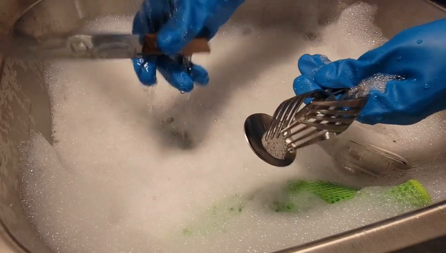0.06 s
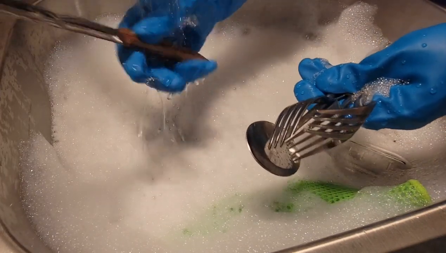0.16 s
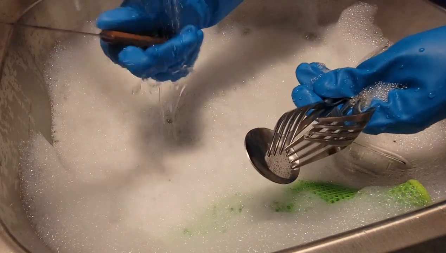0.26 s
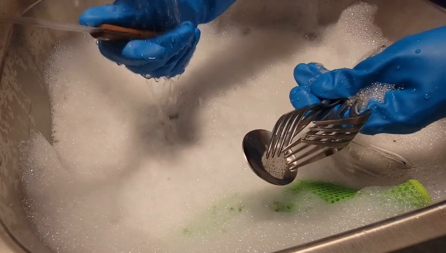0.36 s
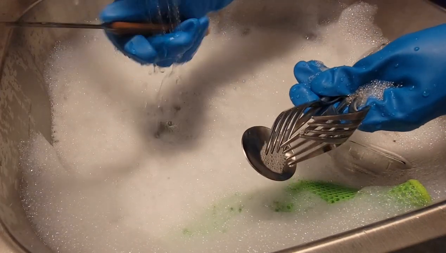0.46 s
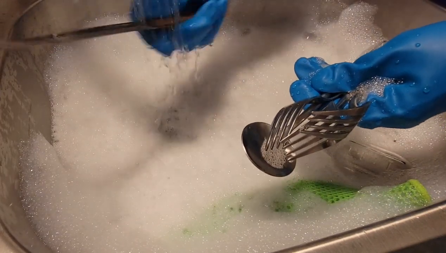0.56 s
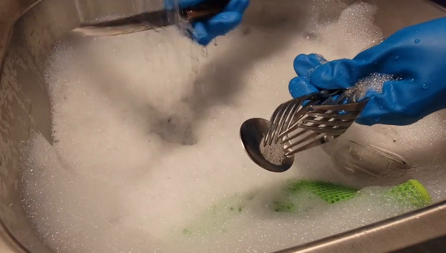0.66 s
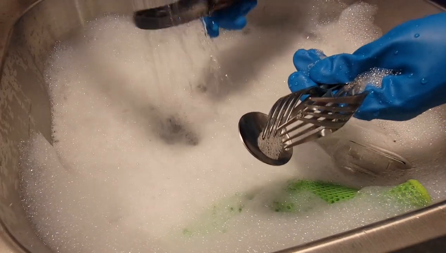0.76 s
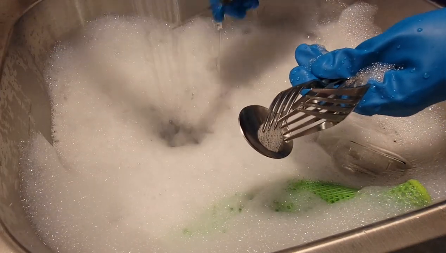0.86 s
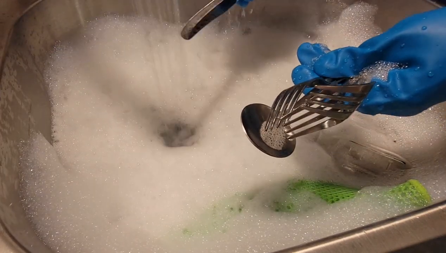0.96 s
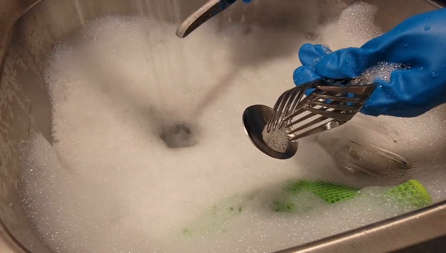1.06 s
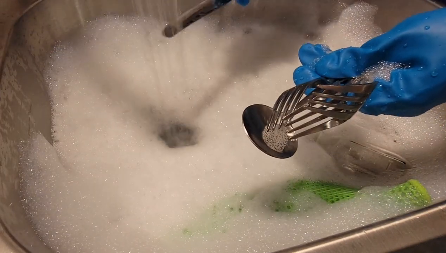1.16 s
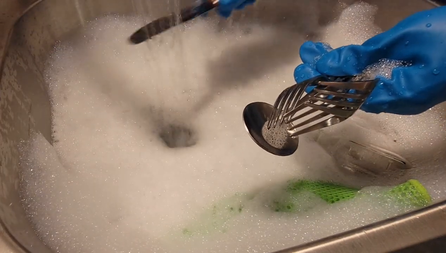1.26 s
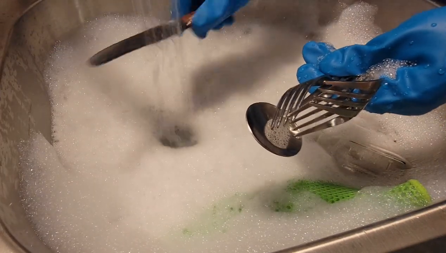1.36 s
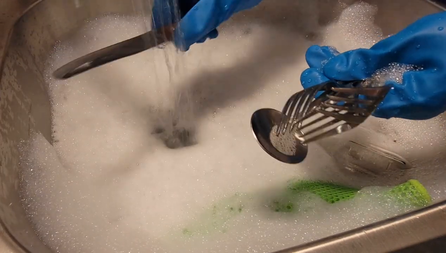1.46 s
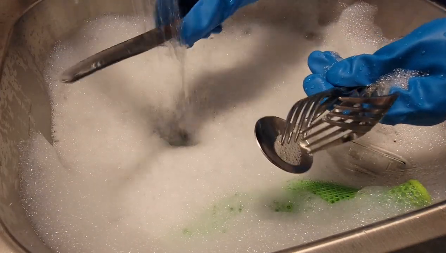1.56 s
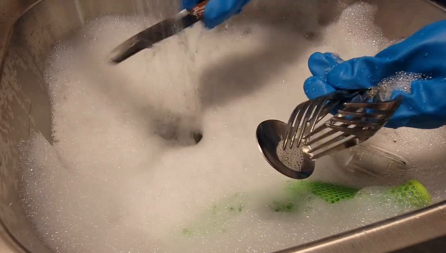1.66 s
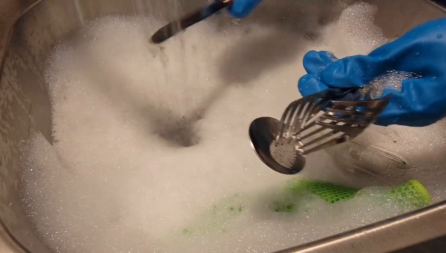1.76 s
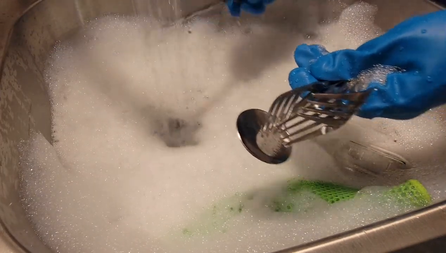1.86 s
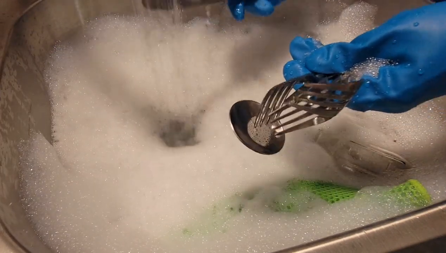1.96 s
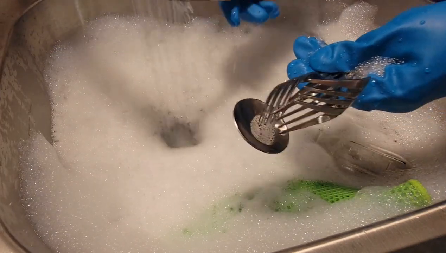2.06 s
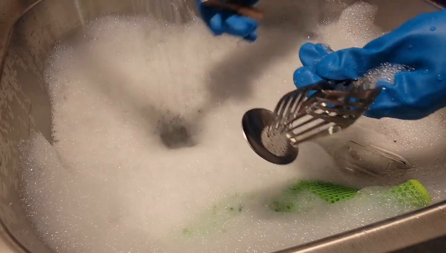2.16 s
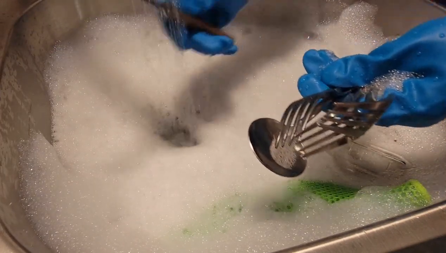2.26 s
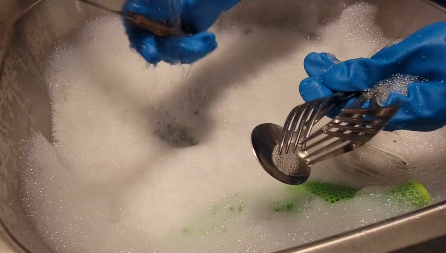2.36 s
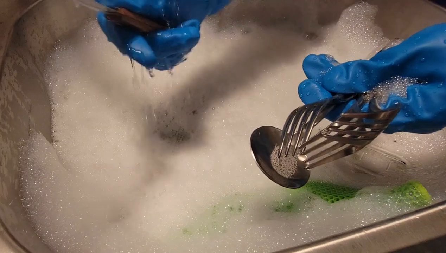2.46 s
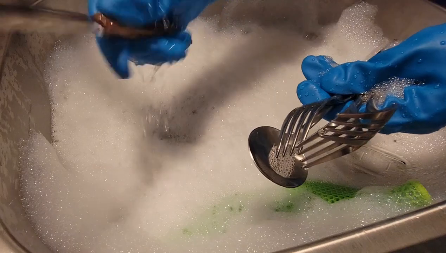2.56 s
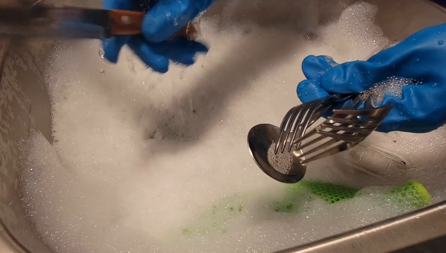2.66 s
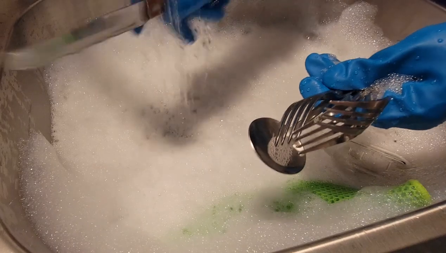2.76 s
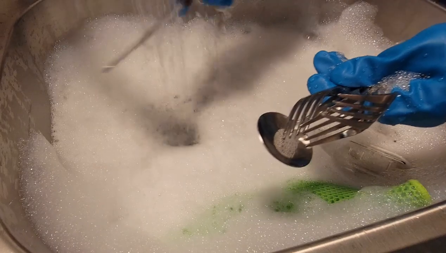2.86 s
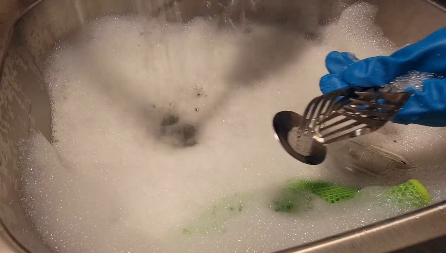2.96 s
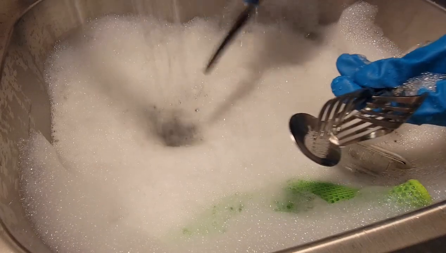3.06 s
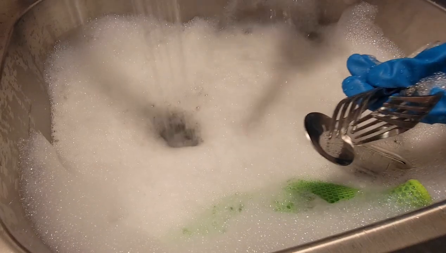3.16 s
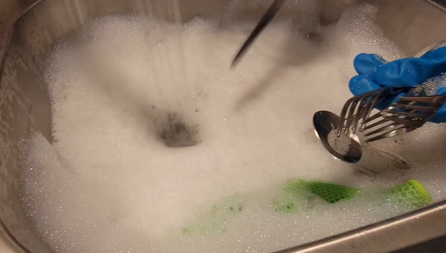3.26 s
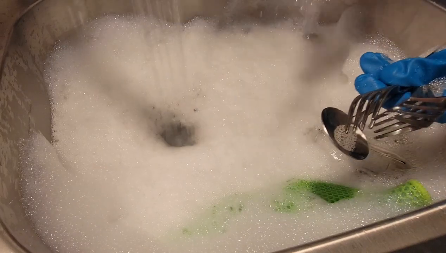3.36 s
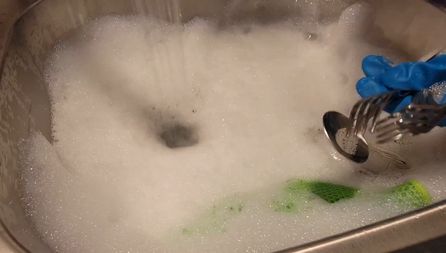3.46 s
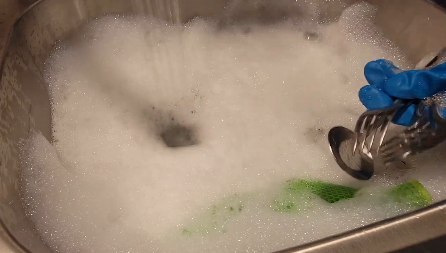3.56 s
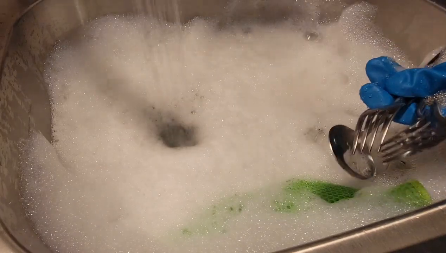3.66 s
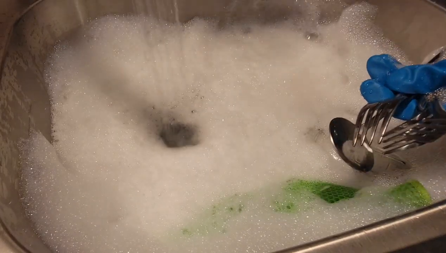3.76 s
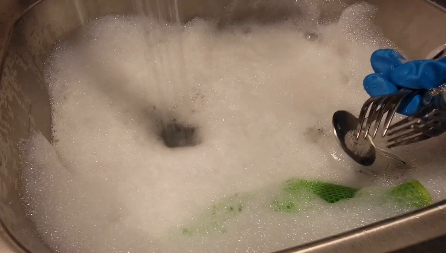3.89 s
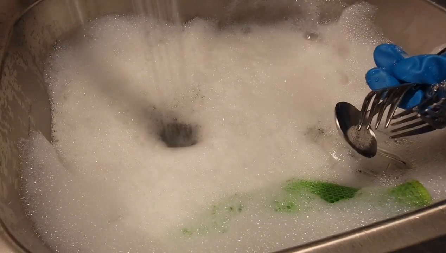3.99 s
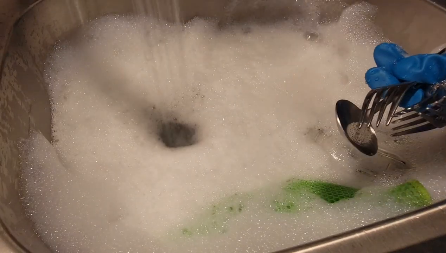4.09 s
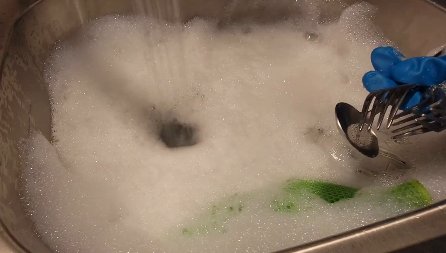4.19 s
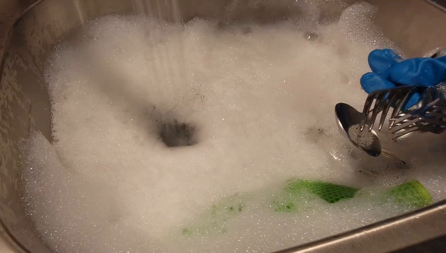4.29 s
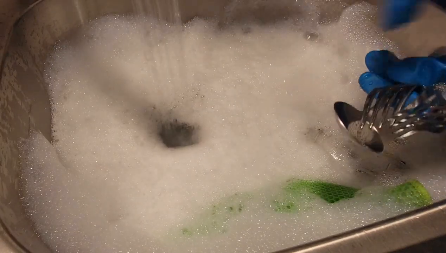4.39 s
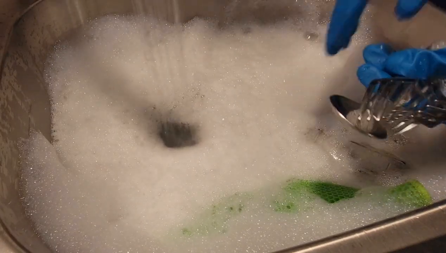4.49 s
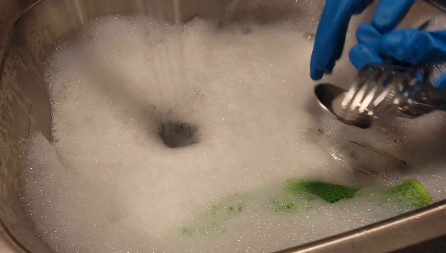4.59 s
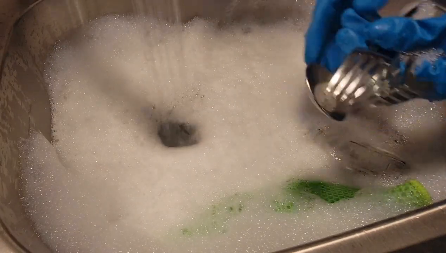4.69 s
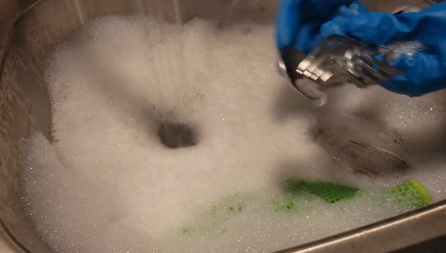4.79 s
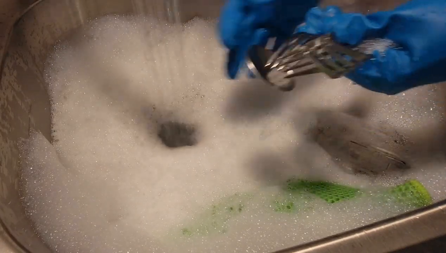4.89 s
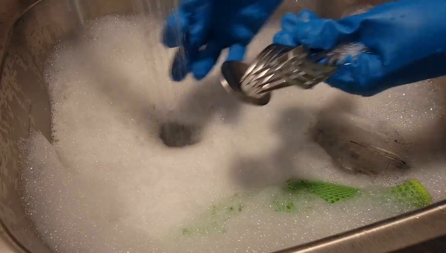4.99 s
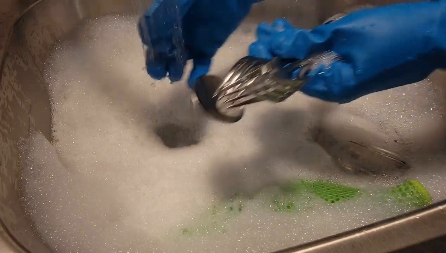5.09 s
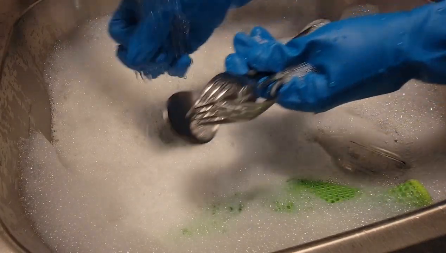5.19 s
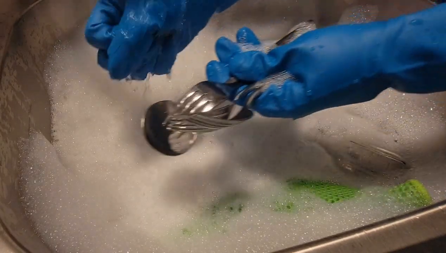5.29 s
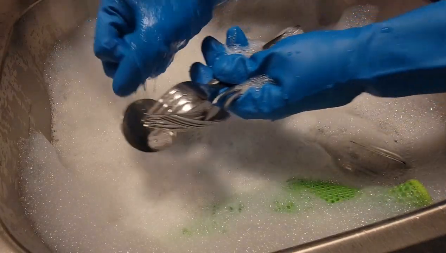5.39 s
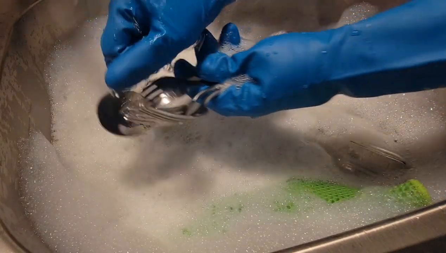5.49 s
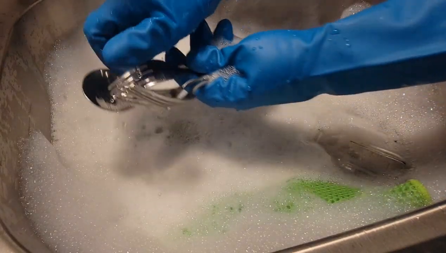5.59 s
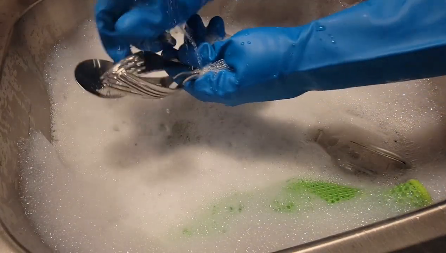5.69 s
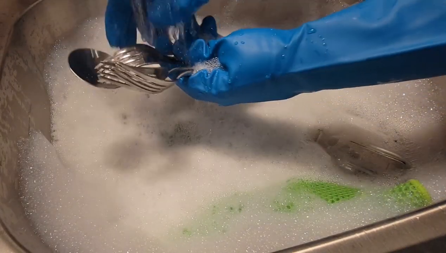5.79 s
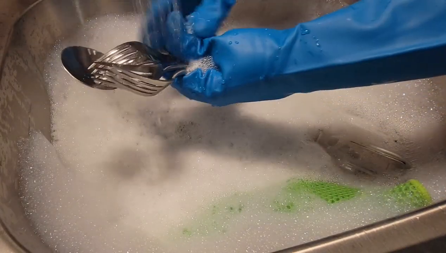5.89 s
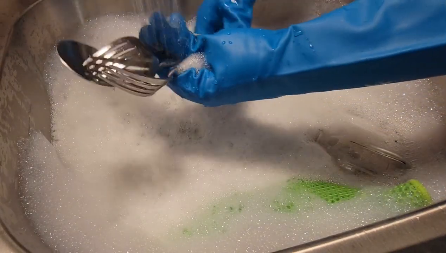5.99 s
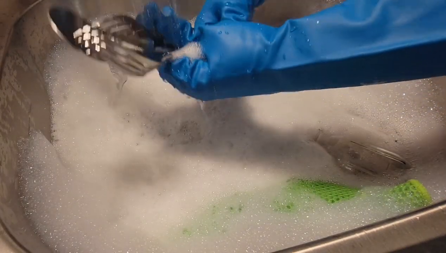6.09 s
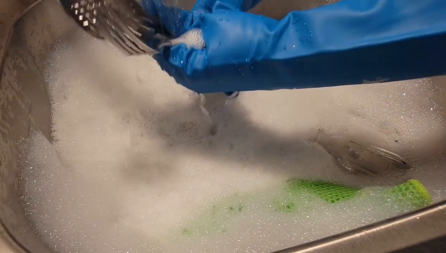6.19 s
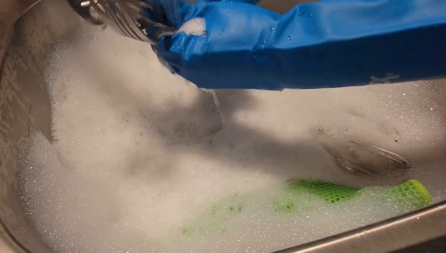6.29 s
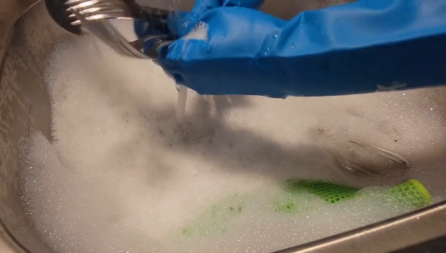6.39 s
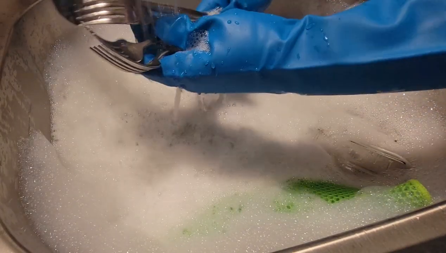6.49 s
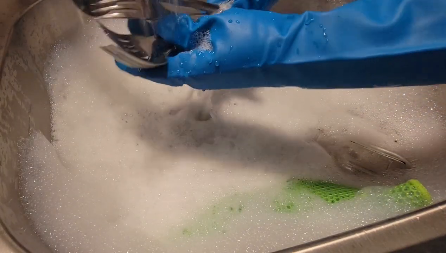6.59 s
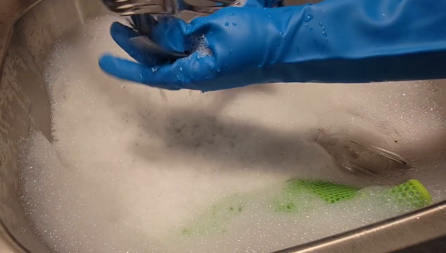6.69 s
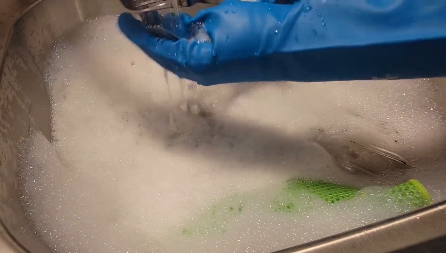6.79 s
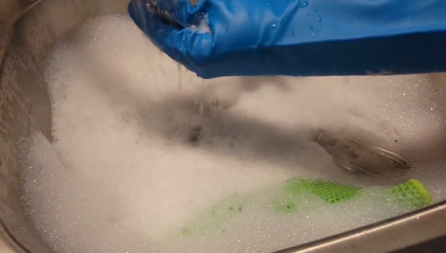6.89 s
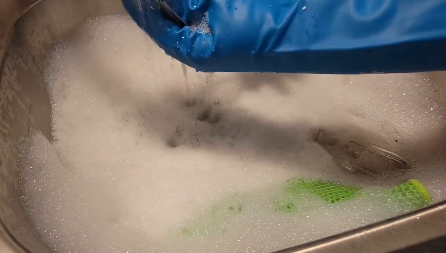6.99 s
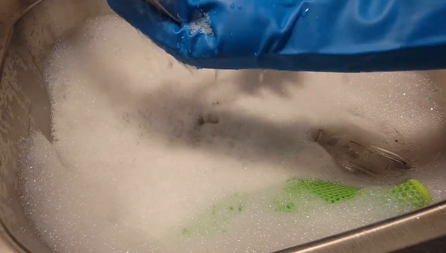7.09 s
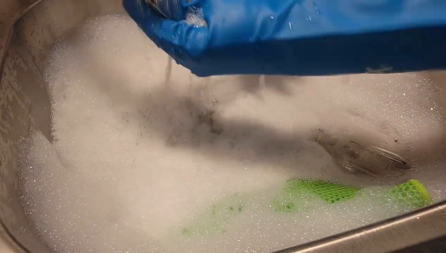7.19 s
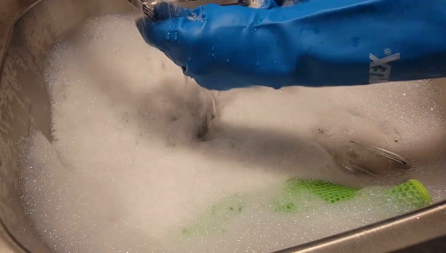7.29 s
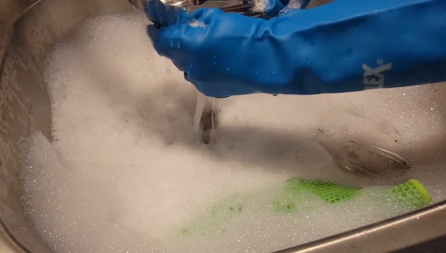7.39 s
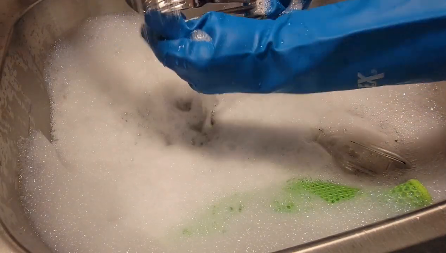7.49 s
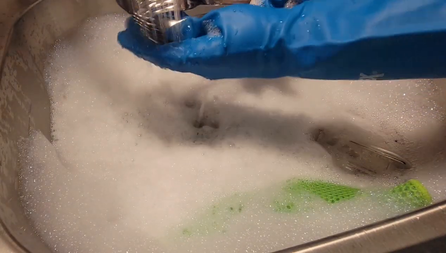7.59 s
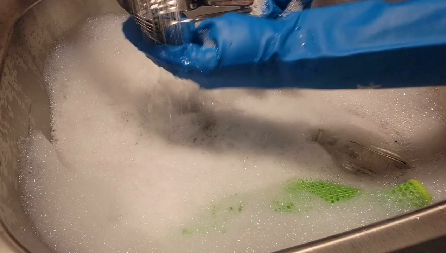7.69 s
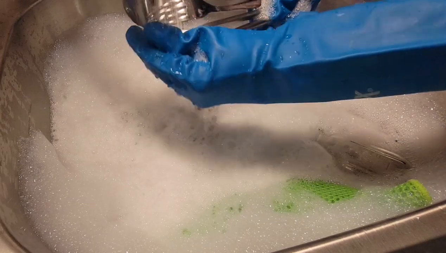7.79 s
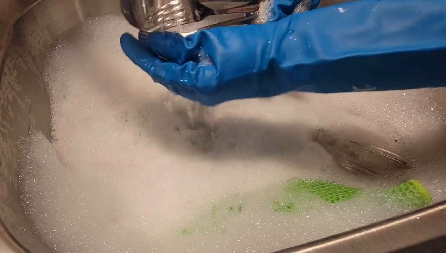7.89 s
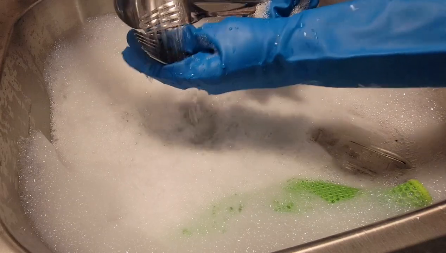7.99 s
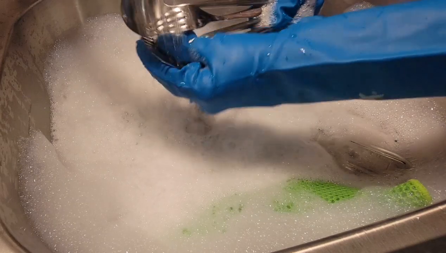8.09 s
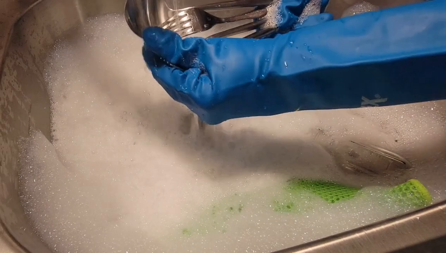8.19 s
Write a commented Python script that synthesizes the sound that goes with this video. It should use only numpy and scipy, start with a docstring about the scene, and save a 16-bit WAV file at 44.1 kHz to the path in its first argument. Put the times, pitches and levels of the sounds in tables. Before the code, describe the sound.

A close stereo view of a steel sink full of foam in a small kitchen with a short echo and faint low appliance hum. From 0 s a tap stream hisses and patters on suds; a gloved hand dulls it until about 0.9 s, then hollow gurgling opens up, dips around 1.4-1.9 and again near 2.4-3.1 s. Bubbles plop, especially around 3.0-3.4 s, as the gurgle returns fully. At 3.5 s a strong dull thump booms with a rattle, a softer one at 3.75 s, then a knife clatters and bounces at 4.03-4.16 s, to the right. Light cutlery clicks at 4.55 and 4.75 s, a short metallic scrape at 5.27 s. From 5.2 s gloves cover the jet: gurgle vanishes, leaving muted drumming on rubber, splashy rinsing bursts, snapping drops and clinks near 6.0, 6.9 and 8.0 s.

```python
"""A running tap strikes foam in a steel sink while cutlery is rinsed: droplet noise and tiny bubbles.
The jet's hollow gurgles as bubble swarms; hands across the jet turn it to drumming on rubber gloves.
Rinsed cutlery throws off splashes; single bubbles plop and drops snap.
Cutlery clicks and scrapes, and a knife is set down with two dull thumps and a clatter: decaying modes
and noise bursts. Sines make an appliance hum over filtered-noise room murmur."""
import sys
import numpy as np
from scipy import signal
from scipy.fft import rfft, irfft, next_fast_len
from scipy.io import wavfile
from scipy.ndimage import map_coordinates

SR = 44100
rng = np.random.default_rng(int(sys.argv[2]) if len(sys.argv) > 2 else 0)


def inscribe(sig):
    """Save sig as 16-bit PCM at rate SR to the path in sys.argv[1].

    A 1-D sig is mono; a 2-D sig holds one channel per row.
    Samples are clipped to [-1, 1] before scaling.
    """
    pcm = np.round(np.clip(np.atleast_2d(sig).T, -1, 1) * 32767)
    wavfile.write(sys.argv[1], SR, pcm.astype(np.int16))


N = 363825

# single large bubbles: (time [s], level [dB], starting pitch [Hz])
BUBBLES = [(.088, -41, 1480), (1.148, -32, 1670), (1.328, -37, 1750), (2.286, -36, 885), (2.336, -33, 936),
           (3.005, -31.5, 2070), (3.219, -35, 1750), (3.277, -38, 1050), (3.348, -32, 850),
           (3.349, -36.5, 1520), (3.776, -36.5, 880), (4.357, -33, 1564), (4.451, -32.5, 950),
           (4.525, -35.5, 946), (4.664, -36, 860), (4.82, -37, 1630), (5.058, -36, 1820),
           (7.683, -45, 1550), (7.938, -37.5, 1640)]
# largest drops snapping on gloves and foam: (time [s], level [dB], starting pitch [Hz])
DROPS = [(0.35, -36, 12800), (.467, -45, 3000), (0.6083, -35, 12300), (.624, -38, 12600),
         (1.206, -30, 15100), (1.531, -34, 7600), (1.563, -34, 12200), (3.9012, -27, 12100),
         (5.1821, -34, 14400), (5.425, -43, 14300), (5.7767, -34, 10150), (6.056, -31.5, 4750),
         (6.1072, -37, 6230), (6.1342, -37, 4630), (6.1576, -30.5, 13800), (6.2424, -36.5, 4370),
         (6.2734, -39.5, 7720), (6.33, -32, 14400), (6.494, -37, 4240), (6.5657, -43, 4510),
         (6.5845, -41, 4430), (6.7632, -40, 13400), (6.8862, -31.5, 5140), (7.1538, -35, 12200),
         (7.441, -32.5, 12700), (7.684, -37.5, 4400), (7.736, -40, 4000), (7.9974, -40, 4270),
         (8.054, -39, 4600), (8.0612, -33, 4408), (8.088, -39, 4000), (8.1438, -32, 12500),
         (8.157, -37, 4650)]
# blows on the sink: (time [s], level [dB], rattle re blow [dB], loss per octave above main mode [dB])
THUMPS = [(3.498, -15, -14.5, -5), (3.74, -23.5, -21, 10), (3.934, -48, -18, 0), (4.256, -43, -20, 2)]
# knife bounces: (time [s], level [dB])
KNIFE_BOUNCES = [(4.0261, -17.5), (4.0308, -22.5), (4.072, -21.5), (4.077, -23.5), (4.108, -33),
                 (4.1426, -32), (4.1635, -30.5)]
# cutlery contacts: (time [s], level [dB], brightness [dB/octave], bundle jolt re level [dB])
CLICKS = [(3.004, -47, -9.5, -2), (4.549, -28.5, 1, -24), (4.555, -30, 4, -24), (4.748, -31.5, 3, -24),
          (4.763, -32.5, 7, -24), (5.9996, -29, 2.5, -10), (6.011, -33.5, 1, -12), (6.068, -38, -2, 2),
          (6.08, -42, -1, 3), (6.175, -42, 4, -8), (6.328, -38, -1, -9), (6.362, -45, 3, -20),
          (6.8992, -26.5, 0, -12), (7.0712, -40.5, -1, -20), (7.115, -41, -1, -18),
          (7.3182, -37, -3.5, -24), (7.347, -44, -2.5, -24), (7.591, -37.5, -1, -5), (7.718, -46, 6, -23),
          (7.78, -41, -1, -8), (8.022, -27, 3.5, -6.5)]
# modes of the sink, knife and cutlery: (frequency [Hz], level [dB], t60 [s])
SINK_MODES = [(260, -11.5, 0.064), (333, 3, 0.055), (326, -25, 0.27), (335, -26.5, 0.34),
              (352.5, -27, 0.25), (384, -17.5, 0.071), (438, -17.5, 0.13), (570, -22, 0.12),
              (624, -11.5, 0.083), (745, -26, .09), (860, -32, 0.1), (1290, -24, 0.08)]
KNIFE_MODES = [(2265, -5.5, .2), (2420, -1.5, 0.16), (2675, 0, 0.15), (2870, -1, 0.11), (3110, -4, 0.15),
               (3840, -6, 0.14), (3950, 2.5, 0.099), (4330, -1.5, 0.1), (5480, -12, 0.089), (6160, -7, .12),
               (7100, -7, 0.1), (7500, -1, 0.14), (11900, -4, .11), (14600, -4, .13)]
CUTLERY_MODES = [(1480, 0, 0.056), (4400, 0, 0.07), (6020, 0, 0.12), (7550, 3, 0.14), (7940, 3, 0.1),
                 (8800, 0, 0.12), (9900, 2, 0.16), (11430, -2, 0.12), (12000, 1, .1), (13900, 8, .15),
                 (14640, 1, 0.14), (15200, -1, .1)]
# noise spectra of water on foam and gloves: (frequency [Hz], relative density [dB])
SPRAY_SPECTRUM = [(2500, -27), (4500, 0.5), (6000, -7), (7400, -4.5), (8600, -9.5), (10300, -7),
                  (12200, -2.5), (14200, 2.5), (15400, -2.5), (16000, -4)]
PATTER_SPECTRUM = [(500, -12.5), (800, -3), (1100, -8), (1450, 2), (2000, 3.5), (2250, -2.5), (3000, 0.5),
                   (4300, -6.5), (5600, -14), (8000, -24)]
SPLASH_SPECTRUM = [(900, -29), (1500, -7.5), (2300, -1.5), (3300, 3.5), (4500, 2.5), (5400, -12.5),
                   (7300, -6), (8600, -15), (10800, -7), (13000, -0.5), (16000, -18)]
DRUM_SPECTRUM = [(150, -25), (300, 1), (400, 0.5), (560, -4), (700, -4.5), (1100, -23)]
# noise spectrum of the kitchen murmur: (frequency [Hz], relative density [dB])
KITCHEN_SPECTRUM = [(44, -34), (75, 4), (85, -22), (103, 0), (118, -3), (140, -10), (221, -11), (254, -17),
                    (320, -2.5), (376, -7.5), (408, -23), (491, -5), (612, -18), (656, -19.5),
                    (1200, -16.5), (1560, -15.5), (2640, -120)]
# noise spectra of metal contacts: (frequency [Hz], relative density [dB])
RATTLE_SPECTRUM = [(120, -24), (220, 1), (620, 11.5), (950, -1), (1300, 2), (1800, -1), (2150, -10),
                   (2600, -2), (3050, 0), (3600, -9), (4350, 0), (5000, -22), (7700, -12.5), (9000, -20),
                   (16000, -21)]
CLANK_SPECTRUM = [(300, -15), (1000, -3.5), (2000, -10), (2600, 3), (4200, -0.5), (4900, 0.5), (5600, 0.5),
                  (7500, -0.5), (8800, -6), (12000, -2), (15800, 1.5)]
TICK_SPECTRUM = [(300, -34), (900, -25), (1400, 1.5), (2600, -8), (3800, 1), (5200, -3.5), (7300, -3.5),
                 (8500, -10.5), (10500, -1), (12500, -0.5), (15000, -2.5), (16000, -15)]
JOLT_SPECTRUM = [(200, -14), (450, 1), (800, -1), (1150, -4), (1700, -1), (2600, -6), (4000, -22)]
GRIT_SPECTRUM = [(1000, -23), (1600, -1), (3200, -8), (4700, -2), (5200, -17), (6000, 1), (7800, 0),
                 (9500, -4), (13000, -10), (14200, 2), (15200, -3), (16000, -10)]
# tone of the water in the sink, slightly dull around 1-2 kHz: (frequency [Hz], gain [dB])
WATER_TONE = [(250, -0.5), (700, -1.5), (1100, -4.5), (2000, -3.5), (3000, -1.5), (4500, 0)]
# standing waves between the sink's walls: (frequency [Hz], level re direct sound [dB])
STANDING_WAVES = [(380, -2.5), (572, -3.5), (872, -5), (945, -15), (1088, 5.5), (1288, -3), (1445, -4),
                  (1610, -2), (1790, -2.5), (1995, 0.5), (2150, -11), (2470, -0.5), (2710, -9),
                  (2950, -6.5)]
# appliance hum: (frequency [Hz], rms level [dB])
HUM = [(59.4, -58), (108, -75), (217, -73)]
# stereo balance of spray and drops: (frequency [Hz], left minus right [dB])
SPRAY_SIDE = [(1000, 4), (2400, 1), (4400, -2.5), (8000, 16.5), (15000, 4.5)]
DROP_SIDE = [(4400, 2), (8000, 10), (14000, 10)]
# room decay: (frequency [Hz], t60 [s])
ROOM_T60 = [(200, 0.5), (2000, 0.15), (14000, 0.098)]
# jet drumming on rubber: (start [s], end [s], level [dB])
DRUMMING = [(0.05, 0.16, -61), (0.38, 0.66, -66), (2.38, 2.49, -60.5), (5.05, 5.3, -60.5),
            (5.5, 5.68, -58.5), (5.98, 6.12, -57), (7.6, 8.22, -65)]
# knife or glove across the jet: (start [s], end [s], cover [dB])
COVERS = [(-0.3, 3.14, 1), (0.07, 0.85, 10.5), (1.42, 1.92, 5), (2.43, 3.16, 6), (2.5, 2.89, 7),
          (5.2, 8.6, 14)]
# cutlery turned in the jet: (start [s], end [s], splashing level [dB])
RINSES = [(0.02, 0.13, -57.5), (2.92, 3.08, -54.5), (5.2, 5.55, -63), (5.96, 6.56, -52), (6.83, 6.98, -54),
          (7.1, 7.38, -53.5), (7.6, 7.85, -54.5), (7.99, 8.22, -50.5)]
# pitch of the hollow, higher where a weakened jet bores a smaller one: (time [s], pitch [Hz])
HOLLOW = [(0.9, 905), (1.33, 877), (1.55, 970), (1.8, 1000), (2.2, 970), (2.3, 890), (2.451, 990),
          (3.18, 966), (3.29, 1020), (3.35, 874), (3.46, 920), (3.65, 860), (4.45, 914), (4.9, 870),
          (5.2, 885)]

# water gain under the free jet [dB], and loss per dB of cover [dB/dB]
SPRAY_DB, SPRAY_LOSS = -49.5, 1.46
PATTER_DB, PATTER_LOSS = -48.5, 0.81
GURGLE_DB, GURGLE_LOSS = -54, 1.7
SPLASH_DB, SPLASH_LOSS = -56.5, 0.58
RINSE_SPRAY_DB, RINSE_PATTER_DB, RINSE_SPLASH_DB = -2, -8, -1  # re the RINSES level
RINSE_EDGE_S, DRUM_EDGE_S, HAND_EDGE_S = 0.19, 0.057, 0.25  # rise and fall of each kind of spell
DRIBBLE_DB = -69.5  # steady run-off on the gloves
RUN_OFF_DB = -69  # droplets falling from the gloves
HOLLOW_WANDER_HZ = 20
DIRECT_DB = -1.5  # direct path re scattered sound
LEFT_LEADS_S, DETOUR_S = 0.00014, 0.0014  # left-side lead; longest extra path by way of a wall
WAVE_WIDTH_HZ = 34.7
CLICK_ATTACK_S, JOLT_ATTACK_S = 0.00066, 0.005
SLIDE_S, SLIDE_DB = 5.268, -44  # a spoon sliding along a fork
SLIDE_ATTACK_S, SLIDE_HOLD_S = 0.0093, 0.031
TOP_HZ = 15950


def amp(db):
    """Decibels to gain."""
    return np.exp(np.asarray(db) * (np.log(10) / 20))


def unit(x):
    """Scale to rms 1."""
    return x / np.sqrt(np.mean(x ** 2) + 1e-20)


def along(points, hz):
    """Interpolate (Hz, value) points on a log frequency axis."""
    f, v = np.transpose(points)
    return np.interp(np.log(hz + 1), np.log(f + 1), v)


def wobble(rate):
    """A smooth random curve with rate knots per second."""
    knots = rng.standard_normal(int(N * rate / SR) + 4)
    coarse = np.linspace(0, N, num=2000)
    curve = map_coordinates(knots, [coarse * rate / SR])
    return np.interp(np.arange(N), coarse, curve)


def filtered(x, response):
    """Apply a frequency response to x."""
    n = x.shape[-1]
    m = next_fast_len(n + 8192)
    spectrum = rfft(x, m) * response(np.fft.rfftfreq(m, 1 / SR))
    return irfft(spectrum, m)[..., :n]


def coloured(x, spectrum):
    """Shape x by a spectrum and scale to rms 1."""
    return unit(filtered(x, lambda hz: amp(along(spectrum, hz))))


def pan(side_db):
    """Left and right gains for a left-minus-right level."""
    return amp(np.array([[.5], [-.5]]) * side_db)


def add(track, s, sound):
    """Mix a sound into the track at time s."""
    part = track[:, max(round(s * SR), 0):][:, :sound.shape[-1]]
    part += sound[..., :part.shape[1]]


def spell(start, end, edge_s):
    """Gate with smooth tanh edges centred on start and end."""
    t = np.arange(N) / SR
    return .5 + .5 * np.tanh(2 * np.minimum(t - start, end - t) / edge_s)


def swells(rows, edge_s):
    """Summed gain of (start s, end s, dB) spells."""
    return sum(amp(db) * spell(start, end, edge_s) for start, end, db in rows)


def cover():
    """Total dB of cover across the jet at each moment."""
    return sum(db * spell(start, end, HAND_EDGE_S) for start, end, db in COVERS)


def flow(free_db, loss, rinse_db):
    """Water gain: power sum of the covered jet and what rinsed cutlery throws off."""
    jet = amp(free_db - loss * cover())
    thrown = amp(rinse_db) * swells(RINSES, RINSE_EDGE_S)
    return np.hypot(jet, thrown)


def spatter(rate, spread_db):
    """Random signed impulses as droplet impacts; spread_db sets how uneven their sizes are."""
    when, size, sign = rng.random((int(rate * N / SR), 3)).T
    size = amp(-spread_db * np.log(np.maximum(size, .004))) * np.sign(sign - .5)
    return unit(np.bincount((when * N).astype(int), size, N))


def crackle(rate, spread_db, t60):
    """Each droplet impact opens a decaying noise puff: scattered noise plus a left-leading direct part."""
    keep = amp(-120 / (t60 * SR))  # energy decay per sample
    energy = signal.lfilter([1], [1, -keep], spatter(rate, spread_db) ** 2)
    puff = rng.standard_normal(N)
    direct = np.array([puff, np.roll(puff, round(LEFT_LEADS_S * SR))])
    scattered = rng.standard_normal((2, N))
    return unit(np.sqrt(np.abs(energy)) * (scattered + amp(DIRECT_DB) * direct))


def bubble(hz, cycles, rise, t):
    """A bubble loses 60 dB over the given cycles, its pitch climbing as it nears the surface."""
    age = hz * t / cycles
    tone = np.sin(2 * np.pi * hz * t * (1 + rise * np.minimum(age, 1) / 2))
    return tone * amp(-60 * age) * (1 - np.exp(-2 * hz * t))


def froth(pitch_hz, rate, scatter, cycles, spread_db, count=160):
    """A swarm of bubbles of count sizes around a moving pitch, at rms 1."""
    when, detune, size, path = rng.random((int(rate * N / SR), 4)).T
    bell = lambda u: np.log((u + .02) / (1.02 - u)) / 1.5  # uniform to bell-shaped
    start = (when * N).astype(int)
    hz = pitch_hz[start] * np.exp(scatter * bell(detune))
    sizes_hz = np.geomspace(hz.min(), hz.max(), count)
    kinds = np.searchsorted(sizes_hz[:-1], hz)
    gains = amp(spread_db * bell(size))
    t = np.arange(SR // 25) / SR
    waves = bubble(sizes_hz[:, None], cycles, 0.049, t)
    detour_s = np.maximum(2 * path - 1, 0) * DETOUR_S  # half reach the right by way of a wall
    lags = ((LEFT_LEADS_S + detour_s) * SR).astype(int)
    out = np.zeros((2, N + SR))
    for at, lag, kind, gain in zip(start, lags, kinds, gains):
        wave = gain * waves[kind]
        out[0, at:at + len(t)] += wave
        out[1, at + lag:at + lag + len(t)] += wave
    return unit(out[:, :N])


def basin(x, t60, wall_db):
    """Steel walls scatter a sound, differently to left and right: decaying-noise convolution."""
    t = np.arange(SR // 16) / SR
    walls = rng.standard_normal((2, len(t))) * amp(-60 * t / t60)
    walls *= amp(wall_db) / np.linalg.norm(walls[0])
    return x + signal.oaconvolve(np.broadcast_to(x, (2, N)), walls, axes=1)[:, :N]


def ring(modes, t, scatter_db):
    """Struck modes with random strength and phase per side; drifting phase makes them waver."""
    hz, db, t60 = np.transpose(modes)[:, :, None]
    gain = amp(db + scatter_db * rng.uniform(-1.2, 1.37, (2, len(modes), 1)))
    phase = 2 * np.pi * rng.random((2, len(modes), 1))
    steps = rng.standard_normal((len(modes), len(t)))
    waver = np.cumsum(steps, axis=1) * np.sqrt(2 * np.pi * 25 / SR)
    tones = gain * amp(-60 * t / t60) * np.sin(2 * np.pi * hz * t + phase + waver)
    return tones.sum(1) / np.linalg.norm(amp(db))


def burst(spectrum, t, t60):
    """Dense contact noise, uneven in frequency like a crowd of modes, decaying by t60."""
    knots_hz = np.linspace(0, SR / 2, num=150)
    strength_db = 3.5 * rng.standard_normal(len(knots_hz))
    noise = rng.standard_normal((2, len(t)))
    crowd = filtered(noise, lambda hz: amp(np.interp(hz, knots_hz, strength_db)))
    return coloured(crowd, spectrum) * amp(-60 * t / t60) * (1 - np.exp(-t / 0.00028))


def tap():
    """Water strikes foam: droplet puffs and tiny bubbles on a bed of fine hiss."""
    mist = amp(-6) * rng.standard_normal((2, N)) + crackle(rate=810, spread_db=3, t60=0.023)
    fizz = froth(np.full(N, 12000), rate=120, scatter=0.133, cycles=190, spread_db=5.5)
    spray = coloured(mist, SPRAY_SPECTRUM) + amp(-11.0) * fizz
    spray *= flow(SPRAY_DB, SPRAY_LOSS, RINSE_SPRAY_DB) * amp(2.05 * wobble(25))
    impacts = coloured(crackle(rate=300, spread_db=2.5, t60=0.041), PATTER_SPECTRUM)
    beads = froth(np.full(N, 2500), rate=220, scatter=0.3, cycles=26, spread_db=4.5)
    patter = impacts + amp(-6.5) * beads
    patter *= flow(PATTER_DB, PATTER_LOSS, RINSE_PATTER_DB) * amp(1.03 * wobble(18))
    return filtered(spray + patter, lambda hz: pan(along(SPRAY_SIDE, hz)))


def gurgle():
    """The jet drags air into its hollow: large bubbles near its pitch, smaller ones about an octave up."""
    pitch_hz = np.interp(np.arange(N) / SR, *np.transpose(HOLLOW))
    pitch_hz = pitch_hz + HOLLOW_WANDER_HZ * wobble(14)
    large = froth(pitch_hz, rate=260, scatter=.048, cycles=40, spread_db=3.6)
    stray = froth(1.04 * pitch_hz, rate=200, scatter=0.096, cycles=29, spread_db=-0.5)
    small = froth(1.88 * pitch_hz, rate=200, scatter=0.106, cycles=37, spread_db=5)
    bubbles = amp(3.0) * large + amp(-8) * stray + amp(-2.5) * small
    return amp(GURGLE_DB - GURGLE_LOSS * cover() + 2.0 * wobble(21.94)) * bubbles * pan(1.2)


def gloves():
    """The jet drums on rubber and breaks into splashes: noise puffs and small bubbles."""
    flecks = coloured(crackle(rate=210, spread_db=1.7, t60=0.035), SPLASH_SPECTRUM)
    beads = froth(np.full(N, 4100), rate=190, scatter=0.188, cycles=42, spread_db=1.5)
    splash = flecks + amp(-5.5) * beads
    splash *= flow(SPLASH_DB, SPLASH_LOSS, RINSE_SPLASH_DB) * amp(0.49 * wobble(30))
    drum_gain = np.hypot(amp(DRIBBLE_DB), swells(DRUMMING, DRUM_EDGE_S))
    drum = drum_gain * coloured(crackle(rate=150, spread_db=0, t60=0.029), DRUM_SPECTRUM)
    return splash * pan(1.4) + drum


def run_off():
    """Sparse droplets fall from wet gloves and tick on the foam as short high bubbles."""
    ticks = froth(np.full(N, 12000), rate=38, scatter=0.14, cycles=14, spread_db=4)
    return amp(RUN_OFF_DB) * basin(ticks, t60=0.013, wall_db=-1.5) * pan(6)


def kitchen():
    """Slightly unsteady hum sines over the filtered-noise murmur of pipes and room."""
    t = np.arange(N) / SR
    hum = np.zeros(N)
    for hz, db in HUM:
        gain = amp(db + 0.35 * wobble(7)) * np.sqrt(2)  # rms to peak
        hum += gain * np.sin(2 * np.pi * hz * t + 0.21 * wobble(6.5))
    mid, side = coloured(rng.standard_normal((2, N)), KITCHEN_SPECTRUM)
    side = filtered(side, lambda hz: amp(along([(120, -10.0), (300, -2.5), (800, 8.5)], hz)))
    murmur = np.array([mid + side, mid - side]) * pan(0.46)
    rumble = coloured(rng.standard_normal(N), [(15, -11), (35, 8), (60, -11), (110, -23), (200, -49)])
    return hum + amp(-78.0) * rumble + amp(-59.5 + 2.4 * wobble(3.903)) * murmur


def drips():
    """Single bubbles plop with a small noise slap; drops snap as short tones with a noise splat."""
    plops, snaps = np.zeros((2, N)), np.zeros((2, N))
    t = np.arange(SR // 20) / SR
    for s, db, hz in BUBBLES:
        slap = burst(PATTER_SPECTRUM, t, t60=0.027)
        plop = bubble(hz, cycles=23.0, rise=0.049, t=t) + amp(-17) * slap
        add(plops, s, amp(db + 1.0) * plop)
    for s, db, hz in DROPS:
        splat = rng.standard_normal((2, len(t))) * amp(-60 * t / 0.0088)
        snap = bubble(hz, cycles=25, rise=0.04, t=t) + amp(-13.0) * splat
        add(snaps, s, amp(db + 0.5) * snap)
    snaps = filtered(basin(snaps, t60=0.045, wall_db=3), lambda hz: pan(along(DROP_SIDE, hz)))
    return basin(plops, t60=0.042, wall_db=-0.5) + snaps


def cutlery():
    """Spoons and forks knock: short modes and a tick of set brightness, plus a duller bundle jolt."""
    out, t = np.zeros((2, N)), np.arange(SR // 4) / SR
    for s, db, bright_db, jolt_db in CLICKS:
        tone = ring(CUTLERY_MODES, t, scatter_db=2)
        click = amp(-12.5) * tone + amp(-1.5) * burst(TICK_SPECTRUM, t, t60=0.048)
        click = filtered(click, lambda hz: amp(bright_db * np.log2(np.maximum(hz, 1500) / 8000)))
        add(out, s, amp(db) * click * (1 - np.exp(-t / CLICK_ATTACK_S)))
        jolt = burst(JOLT_SPECTRUM, t, t60=0.06) * (1 - np.exp(-t / JOLT_ATTACK_S))
        add(out, s, amp(db + jolt_db - 6) * jolt)
    return out * pan(4.3)


def thumps():
    """Blows swell the sink's low modes, each with a knife rattle pulsed at the main mode."""
    out, t = np.zeros((2, N)), np.arange(SR // 2) / SR
    main_hz = SINK_MODES[1][0]
    for s, db, rattle_db, soft_db in THUMPS:
        boom = np.zeros((2, len(t)))
        for hz, level_db, t60 in SINK_MODES:
            dull_db = soft_db * max(np.log2(hz / main_hz), 0)
            # left-right phase difference grows with frequency
            apart = np.array([[.5], [-.5]]) * min((hz / 420) ** 2, 2)
            mode = np.sin(2 * np.pi * hz * (t - .009) + apart)
            boom += amp(level_db - dull_db - 60 * t / t60) * mode
        add(out, s, amp(db + 8.5) * boom * (1 - np.exp(-(t / 0.0084) ** 2)))
        chatter = 1 + 0.45 * np.cos(2 * np.pi * main_hz * t)  # the blade taps once per swing of the steel
        rattle = burst(RATTLE_SPECTRUM, t, t60=0.16) * chatter * (1 - np.exp(-t / 0.0038))
        add(out, s - .002, amp(db + rattle_db + 6.5) * rattle)
    return out


def knife():
    """The knife falls over and bounces to rest, off to the right: blade modes and noise clanks."""
    out, t = np.zeros((2, N)), np.arange(SR // 3) / SR
    for s, db in KNIFE_BOUNCES:
        tone = ring(KNIFE_MODES, t, scatter_db=3)
        clank = burst(CLANK_SPECTRUM, t, t60=0.078)
        add(out, s, amp(db) * (amp(-7.5) * tone + amp(-3.5) * clank))
    return out * pan(-6.0)


def stroke(t60):
    """Slide envelope: quick bite, hold, exponential decay."""
    t = np.arange(N) / SR - SLIDE_S
    decay_s = np.maximum(t - SLIDE_ATTACK_S - SLIDE_HOLD_S, 0)
    return np.clip(t / SLIDE_ATTACK_S, 0, 1) * amp(-60 * decay_s / t60)


def scrape():
    """Steel slips on steel in tiny jerks that excite cutlery modes and grit noise."""
    slips = spatter(rate=1300, spread_db=-1.0)[None]
    t = np.arange(SR // 4) / SR
    ringing = ring(CUTLERY_MODES[2:], t, scatter_db=6)
    tone = unit(signal.fftconvolve(slips, ringing, axes=1)[:, :N])
    rasp = burst(GRIT_SPECTRUM, t, t60=0.019)
    grit = unit(signal.fftconvolve(slips, rasp, axes=1)[:, :N])
    slide = amp(-2.5) * tone * stroke(t60=0.23) + amp(0.5) * grit * stroke(t60=0.18)
    return amp(SLIDE_DB) * slide * pan(5.1)


def standing_waves(x):
    """Air resonances between the sink's walls add fixed peaks to the water sound."""
    def response(f):
        peaks = 0
        for hz, db in STANDING_WAVES:
            damping = 1j * f * WAVE_WIDTH_HZ
            peaks = peaks + amp(db) * damping / (hz * hz - f * f + damping)
        return (1 + peaks) * amp(along(WATER_TONE, f))
    return filtered(x, response)


def room(x):
    """The kitchen's short echo: convolution with noise that dies faster in the treble."""
    hz, t, z = signal.stft(rng.standard_normal((2, SR // 2)), SR, nperseg=256)
    decay = amp(-60 * t / along(ROOM_T60, hz)[:, None])
    tail = signal.istft(z * decay, SR, nperseg=256)[1]
    tail = np.pad(tail, ((0, 0), (SR // 200, 0)))  # 5 ms pre-delay
    return signal.oaconvolve(x, tail / np.linalg.norm(tail[0]), axes=1)[:, :N]


def scene():
    """Water and metal close by, in a small kitchen."""
    water = standing_waves(tap() + gurgle() + gloves()) + run_off() + drips()
    metal = cutlery() + knife() + scrape()
    knocks = thumps()
    echo = room(amp(-6) * water + amp(-7.5) * metal + amp(-15) * knocks)
    return water + metal + knocks + echo + kitchen()


def record(dry):
    """Steep low-pass at TOP_HZ."""
    return filtered(dry, lambda hz: 1 / (1 + (hz / TOP_HZ) ** 200))


dry = scene()
out = record(dry)
inscribe(out)
```